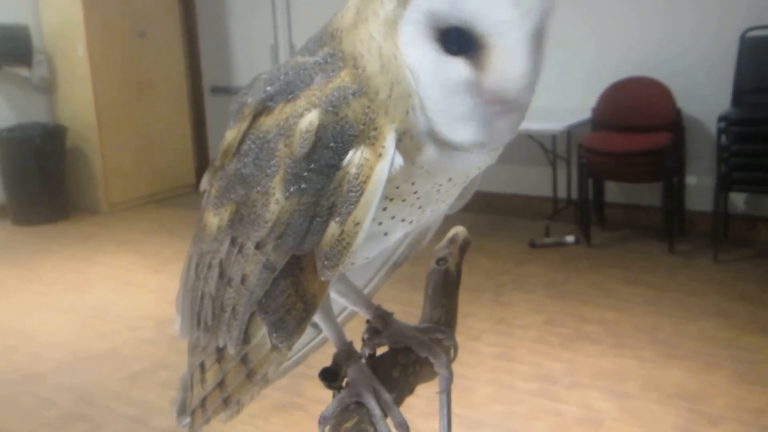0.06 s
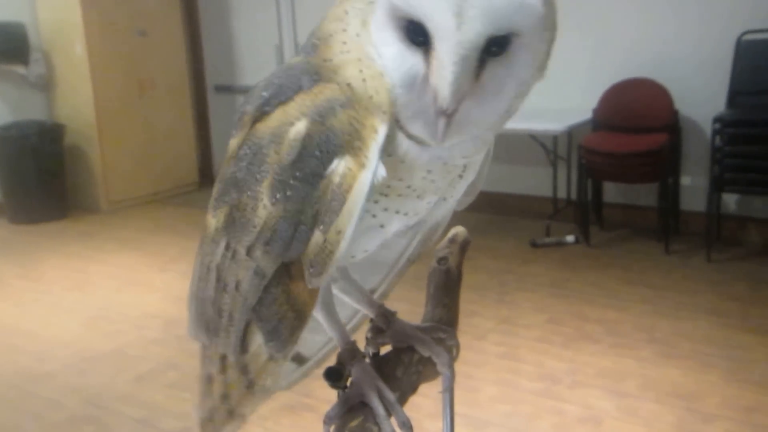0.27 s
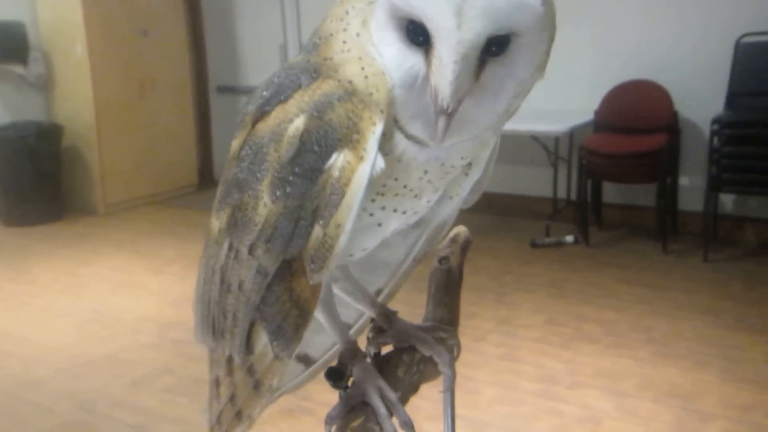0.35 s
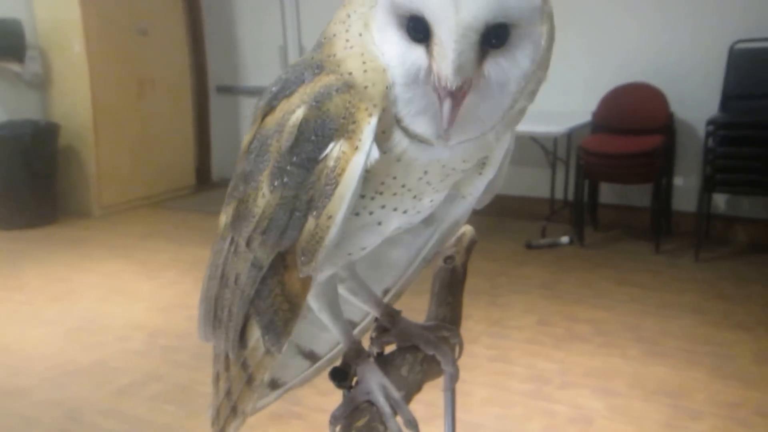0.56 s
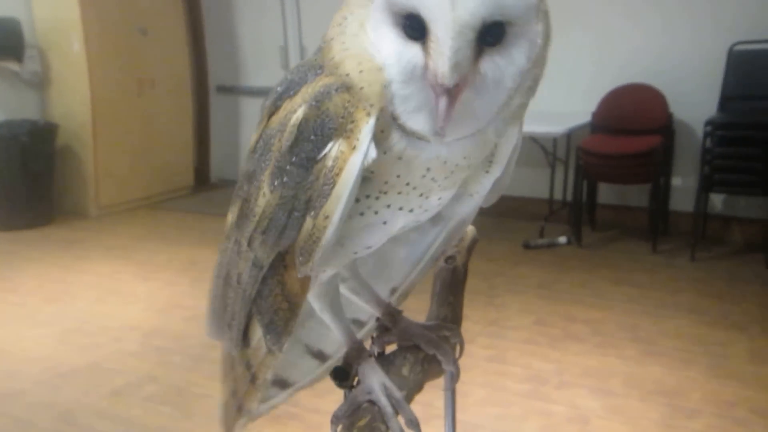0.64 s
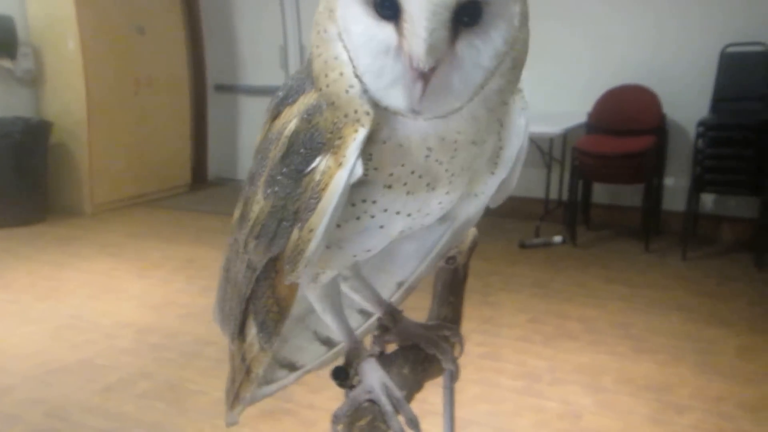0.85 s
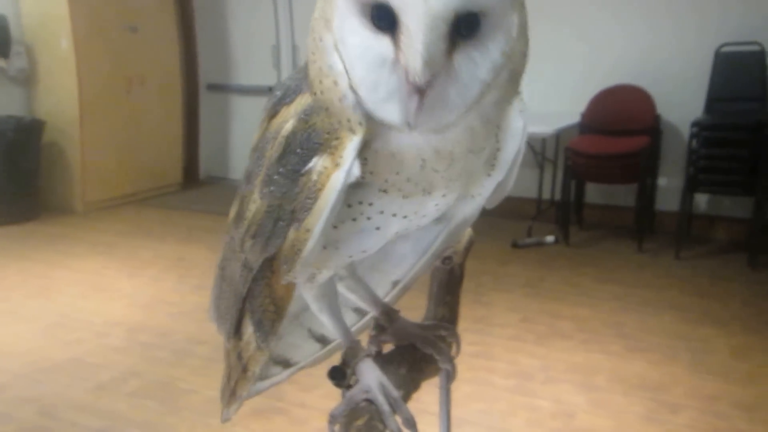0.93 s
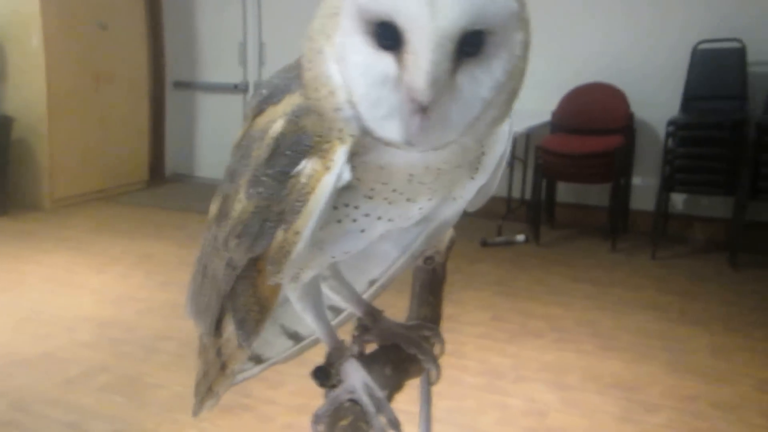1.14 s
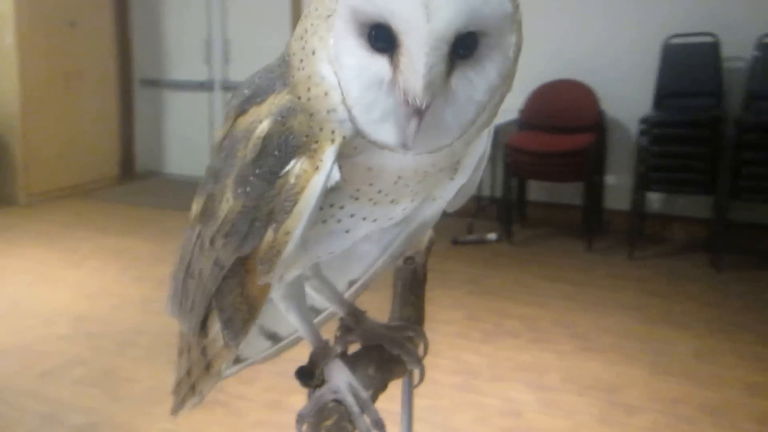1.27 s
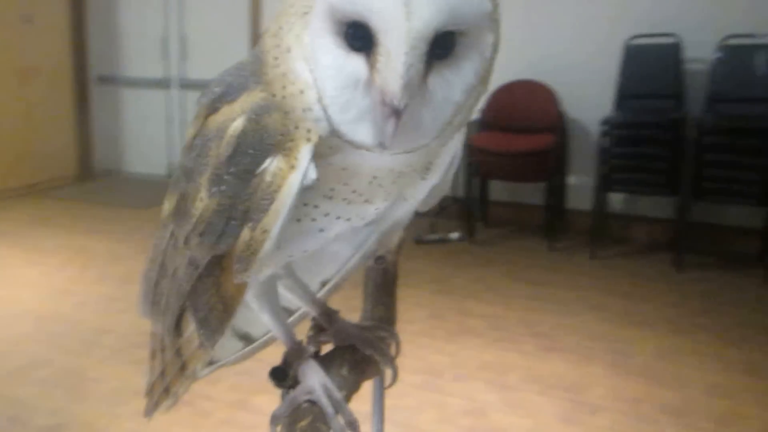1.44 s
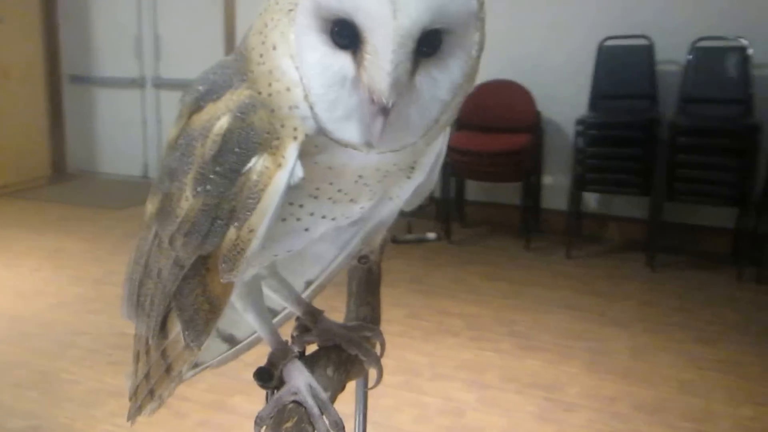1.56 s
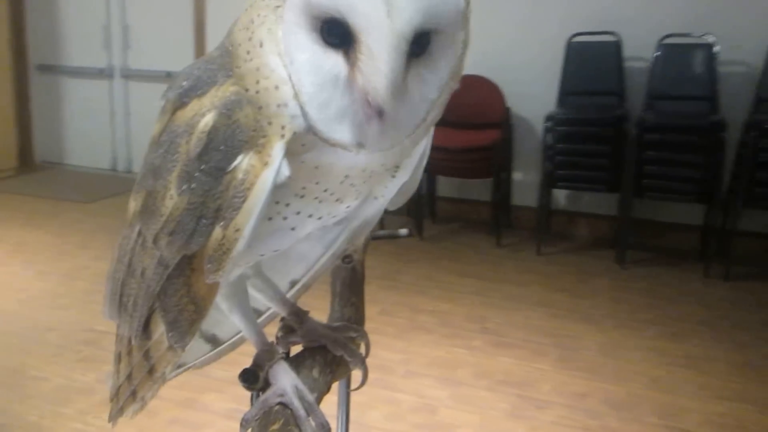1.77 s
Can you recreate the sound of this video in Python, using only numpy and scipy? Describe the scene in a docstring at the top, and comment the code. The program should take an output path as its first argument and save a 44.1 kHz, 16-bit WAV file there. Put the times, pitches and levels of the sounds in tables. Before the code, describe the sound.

One rasping owl screech, heard up close, climbs slightly and ends on a brief whistle. Its echo fades in a large room while the bird rustles softly and its talons tap lightly on the perch.

```python
"""A large bare room, with a barn owl close by. It screeches once: air puffing through the throat makes
a rasping hiss, and the syrinx adds a rough tone that climbs, flutters as the voice catches and ends
on a brief whistle. The room rings on under a soft rustle and a few small taps, probably talons
shifting on the perch. An automatic gain control ducks the screech and recovers slowly."""
import sys
import numpy as np
from scipy import signal
from scipy.fft import rfft, irfft, next_fast_len
from scipy.io import wavfile
from scipy.ndimage import map_coordinates

SR = 44100
rng = np.random.default_rng(int(sys.argv[2]) if len(sys.argv) > 2 else 0)


def dump(signal):
    """Clip the signal to [-1, 1] and save it as 16-bit WAV at the path in sys.argv[1]."""
    limited = np.clip(np.atleast_2d(signal).T, -1, 1)
    pcm = np.round(limited * 32767).astype(np.int16)
    wavfile.write(sys.argv[1], SR, pcm)


N = 79380

# The glide of the voice. Each row: time in seconds, pitch in Hz.
VOICE_PITCH = [(.204, 950), (.212, 1457), (.226, 1699), (.25, 1810), (.30, 1969), (.36, 2060), (.42, 2135),
               (.50, 2164), (.565, 2257), (.615, 2286), (.645, 2179), (.675, 1947)]
# Fader moves for four layers. Each row: time in seconds, level in dB.
HISS_FADER = [(.203, -75), (.208, -70), (.216, -44), (.224, -29), (.247, -14.5), (.275, -14), (.38, -10),
              (.47, -11.5), (.515, -12.5), (.545, -15), (.58, -10.5), (.635, -10), (.667, -17), (.682, -39),
              (.70, -75)]
TONE_FADER = [(.203, -68), (.209, -43), (.225, -38.5), (.25, -19), (.33, -15.5), (.42, -14), (.48, -16.5),
              (.54, -27.5), (.58, -15.5), (.63, -20), (.665, -18.5), (.685, -31.5)]
RUSTLE_FADER = [(1.10, -66), (1.14, -42.5), (1.21, -48), (1.30, -51), (1.40, -54), (1.52, -61.5),
                (1.66, -61), (1.8, -70)]
RUMBLE_FADER = [(0, -60.5), (.18, -55.5), (.3, -66), (.6, -67), (1.0, -64), (1.25, -60), (1.45, -61.5),
                (1.65, -61), (1.8, -63.5)]
# Catches in the voice. Each row: centre in seconds, length in seconds, level in dB.
CATCHES = [(0.333, 0.017, -16), (0.358, 0.0061, -12), (0.385, 0.0096, -11.5), (.412, 0.0067, -6.5),
           (0.442, 0.0065, -8), (.468, 0.0058, -3), (0.497, 0.0091, -4), (.530, 0.01, -5.5),
           (.564, 0.014, -11)]
# Three timbres of the voice. Each entry: a partial's level in dB, from the fundamental up.
TONE_PARTIALS_DB = [-0.5, 3.5, -24, -13.5]
CATCH_PARTIALS_DB = [-5.5, 0.5, -2.5, 3.5, -20, -25]
WHISTLE_PARTIALS_DB = [2.5, -6.5, -32, -23]
# Narrow notches in the call. Each row: centre in Hz, half-width in Hz, depth in dB.
CALL_NOTCHES = [(4740, 37, 13.5), (4930, 120, 6.5), (6060, 42, 14), (6510, 50, 23), (6990, 64, 8.5),
                (12000, 97, 27)]
# Taps on the perch. Each row: time in seconds, level in dB, brightness in dB per octave.
TAPS = [(1.134, -38, -5), (1.1346, -32, 0), (1.2850, -23.5, -1.5), (1.365, -32.5, -4.5),
        (1.379, -32.5, 2.5), (1.3827, -22, -3), (1.3856, -16, -0.5), (1.4087, -31, -1.5), (1.551, -54, 4.5),
        (1.6748, -37, -3.5), (1.709, -42.5, -1.5), (1.753, -35.5, -5.5), (1.782, -51, 3)]
# The perch's resonances. Each row: frequency in Hz, level in dB, 60 dB decay time in seconds.
PERCH_MODES = [(137, -16, 0.016), (550, -13.5, 0.0057), (1000, -15, 0.012), (1590, -14.5, .011),
               (2082, -8, 0.011), (3830, -7, 0.0063), (5300, -0.5, 0.0049), (5820, -1, 0.0057),
               (7000, -10.5, 0.0094), (9280, -12.5, 0.0027), (10500, -12, 0.0043), (12500, -22.5, 0.0078)]
# EQ curves for the noise layers and the reverb. Each row: frequency in Hz, level in dB.
THROAT_EQ = [(100, -7.5), (1800, -6), (2300, -3), (2800, -8.5), (3700, -5.5), (4500, -13.5), (5350, -4),
             (5850, 3), (6600, 1), (7600, 1), (8600, 1.5), (9400, -5), (10500, -8.5), (12000, -15),
             (12900, -23), (15500, -38.5)]
OPENING_EQ = [(100, -11.5), (650, -14.5), (950, -5), (1400, 6), (2000, 1), (4000, -18)]
CRACK_EQ = [(100, -7), (6500, 9.5), (8000, -10), (12000, -9), (15000, -36)]
RUSTLE_EQ = [(80, -12), (500, 1), (1000, -2), (1450, 8.5), (1900, 1.5), (3200, 2), (5800, -7), (7000, -4),
             (9500, -4), (11000, -14), (12400, -24), (13100, -26), (15000, -40)]
REVERB_EQ = [(200, -26), (1200, -22), (1850, -19), (2280, -20.5), (3000, -20), (3900, -21), (4500, -12),
             (5800, -20), (7000, -24), (8500, -17), (12000, -28)]
ROOM_TONE_EQ = [(25, -20), (60, -1.5), (180, -8.5), (450, -11.5), (1000, -14), (1450, -14.5), (1900, -17.5),
                (6000, -24), (10000, -28.5), (13000, -40), (15500, -35)]
RUMBLE_EQ = [(20, -5), (60, -2), (130, -2), (250, -7), (500, -15.5), (1200, -24.5), (4000, -44)]
# The length of the reverb. Each row: frequency in Hz, 60 dB decay time in seconds.
REVERB_T60 = [(200, 5.5), (2200, 1.53), (4400, 1.51), (6000, 1.5), (8500, 0.84), (11000, 1.06), (15000, .4)]

TIME = np.arange(N) / SR


def screech(chirp_db=-49, catch_hiss_db=-8, whistle_db=-13.5):
    """The owl's call: an upward flick, hiss over a rough tone, a run of catches, a clean whistle."""
    pitch = curve(VOICE_PITCH)
    catches = sum(amp(db) * hump(s, length) for s, length, db in CATCHES)
    air = (fader(HISS_FADER) + amp(catch_hiss_db) * catches) * throat_hiss(pitch)
    flutter = amp(2 * wobble(170))  # the tone comes in uneven puffs
    rough = fader(TONE_FADER) * flutter
    rough *= syrinx(pitch, TONE_PARTIALS_DB, jitter=.06, jitter_rate=1400, shimmer_db=2.5, spread=.8)
    bend = sum(hump(s, length) * 2 * (TIME - s) / length for s, length, _ in CATCHES)
    catch_pitch = pitch * (.98 + .015 * bend)  # each catch sits a little flat and bends up
    caught = catches * syrinx(catch_pitch, CATCH_PARTIALS_DB,
                              jitter=.013, jitter_rate=900, shimmer_db=1.2, spread=.4)
    chirp = amp(chirp_db) * hump(centre_s=.2105, length_s=.0063)
    chirp *= syrinx(pitch, TONE_PARTIALS_DB, jitter=.02, jitter_rate=900, shimmer_db=1, spread=.3)
    whistle = amp(whistle_db) * hump(centre_s=.6212, length_s=.049)
    whistle *= syrinx(pitch, WHISTLE_PARTIALS_DB, jitter=.005, jitter_rate=700, shimmer_db=.5, spread=.1)
    notches = lambda hz: amp(-sum(db / (1 + ((hz - centre) / width) ** 2)
                                  for centre, width, db in CALL_NOTCHES))
    return filtered(chirp + opening_rasp() + air + rough + caught + whistle, notches)


def throat_hiss(pitch, rasp_db=1.5, rasp_per_s=1500, mid_pitch_hz=2070, treble_hz=8800):
    """Air in irregular puffs through the throat, whose colour shifts with the pitch."""
    puffs = rng.standard_normal(N) * amp(rasp_db * wobble(rasp_per_s))
    hz, t, spectrum = signal.stft(puffs, SR, nperseg=512)
    hz, frame_pitch = hz[:, None], np.interp(t, TIME, pitch)
    low_cut_db = np.clip(40 * np.log2((hz + 1) / (.99 * frame_pitch)), -25, 0)  # thin below the pitch
    rise_octaves = np.clip(np.log2(frame_pitch / mid_pitch_hz), -.25, .25)
    treble_db = -20.5 * rise_octaves / (1 + (treble_hz / (hz + 1)) ** 20)  # duller as the pitch climbs
    colour = amp(along(THROAT_EQ, hz) + low_cut_db + treble_db)
    return unit(signal.istft(spectrum * colour, SR, nperseg=512)[1][:N])


def syrinx(pitch, partials_db, jitter, jitter_rate, shimmer_db, spread):
    """Partials of one unsteady oscillation, each drifting in level and, by spread radians, in phase."""
    phase = 2 * np.pi * np.cumsum(pitch * (1 + jitter * wobble(jitter_rate))) / SR
    return unit(sum(amp(db + shimmer_db * wobble(500)) * np.sin(k * phase + spread * wobble(450))
                    for k, db in enumerate(partials_db, 1)))


def opening_rasp(peak_s=.228, attack_s=.0098, t60_s=.98, level_db=-36):
    """The throat rasps low as the beak opens, fading as it tightens."""
    t = TIME - peak_s
    log_gain = np.where(t < 0, -(t / attack_s) ** 2 / 2, -np.log(1000) * t / t60_s)
    return amp(level_db) * np.exp(log_gain) * noise(OPENING_EQ)


def talon_taps(attack_s=.0003, crack_db=-2, crack_t60_s=.0056, low_cut_hz=90):
    """Each tap is a short crack and a dead ring of the perch, a little different every time."""
    out = np.zeros(N)
    for s, db, brightness in TAPS:
        ring = np.zeros(N)
        for mode_hz, mode_db, t60 in PERCH_MODES:
            decay = amp(mode_db + rng.normal(0, 2) - 60 * TIME / t60)
            detuned_hz = mode_hz * (1 + .012 * rng.normal())
            ring += decay * np.sin(2 * np.pi * (detuned_hz * TIME + rng.random()))
        crack = amp(crack_db - 60 * TIME / crack_t60_s) * noise(CRACK_EQ)
        tap = (ring + crack) * (1 - np.exp(-TIME / attack_s))
        placed = np.pad(tap, (round((s - attack_s) * SR), 0))[:N]
        tilt = lambda hz: amp(brightness * np.log2(np.clip(hz, 1400, 8000) / 3500))
        out += amp(db) * filtered(placed, lambda hz: tilt(hz) * (hz / (hz - 1j * low_cut_hz)) ** 2)
    return out


def rustle(grain_db=1.6):
    """A soft, slightly grainy brush as the bird shifts."""
    return fader(RUSTLE_FADER) * amp(grain_db * wobble(150)) * noise(RUSTLE_EQ)


def reverb(x):
    """The bare room's diffuse tail; each frequency dies at its own speed."""
    hz, t, spectrum = signal.stft(rng.standard_normal(N), SR, nperseg=256)
    t60 = along(REVERB_T60, hz)[:, None]
    decay = amp(along(REVERB_EQ, hz)[:, None] - 60 * t / t60)
    energy_trim = np.sqrt(2 * np.log(1000) / (t60 * SR))  # a longer tail adds no energy
    tail = signal.istft(spectrum * decay * energy_trim, SR, nperseg=256)[1]
    return signal.fftconvolve(x, np.pad(tail, (SR // 100, 0)))[:N]  # 10 ms pre-delay


def room_tone(bed_db=-59):
    """A faint, steady bed of noise with a low rumble that swells and sinks."""
    return amp(bed_db) * noise(ROOM_TONE_EQ) + fader(RUMBLE_FADER) * noise(RUMBLE_EQ)


def amp(db):
    """Decibels to gain."""
    return 10 ** (np.asarray(db) / 20)


def unit(x):
    """Scale to rms 1."""
    return x / np.sqrt(np.mean(x ** 2) + 1e-20)


def along(points, hz):
    """Read (Hz, value) points on a log frequency axis."""
    point_hz, values = np.transpose(points)
    return np.interp(np.log(hz + 1), np.log(point_hz + 1), values)


def curve(points):
    """Join (seconds, value) points, one value per sample."""
    return np.interp(TIME, *np.transpose(points))


def fader(points):
    """Gain of a (seconds, dB) curve, silent outside it."""
    return amp(np.interp(TIME, *np.transpose(points), left=-np.inf, right=-np.inf))


def hump(centre_s, length_s):
    """The envelope of a round-topped burst."""
    return np.exp(-np.abs(2 * (TIME - centre_s) / length_s) ** 3 / 2)


def wobble(rate):
    """A smooth random curve, rate knots a second."""
    return map_coordinates(rng.standard_normal(N), [np.arange(N) * rate / SR])


def filtered(x, response):
    """Shape x with a gain given as a function of Hz."""
    size = next_fast_len(N + SR // 2)
    return irfft(rfft(x, size) * response(np.fft.rfftfreq(size, 1 / SR)), size)[:N]


def noise(eq):
    """Coloured noise of rms 1."""
    return unit(filtered(rng.standard_normal(N), lambda hz: amp(along(eq, hz))))


def scene():
    """The mono mix: the bird up front, its reverb and the room tone behind."""
    bird = screech() + talon_taps() + rustle()
    return (bird + reverb(bird) + room_tone())[None]


def record(dry):
    """Automatic gain ducks the screech and creeps back up; a steep high cut takes off the very top."""
    threshold_db, slope, attack_s, release_db_per_s, high_cut_hz = -22, .72, .049, 15, 15750
    x, pole = dry[0], np.exp(-1 / (attack_s * SR))
    level_db = 10 * np.log10(signal.lfilter([1 - pole], [1, -pole], x * x) + 1e-12)
    over_db = np.maximum(level_db - threshold_db, 0)
    recovery_db = release_db_per_s * TIME
    duck_db = np.maximum.accumulate(slope * over_db + recovery_db) - recovery_db
    return filtered(x * amp(-duck_db), lambda hz: hz < high_cut_hz)[None]


dry = scene()
out = record(dry)
dump(out)
```